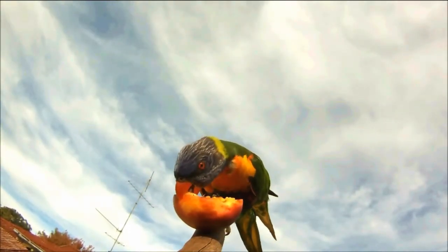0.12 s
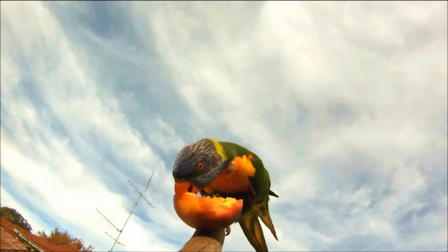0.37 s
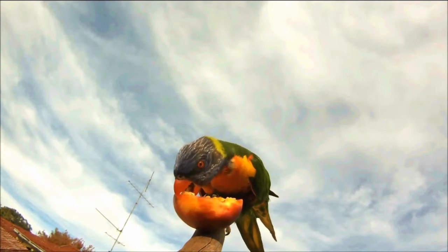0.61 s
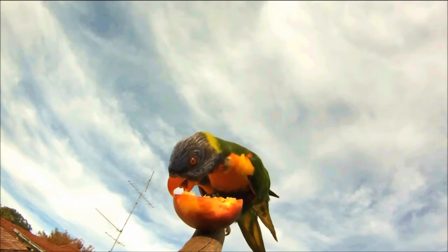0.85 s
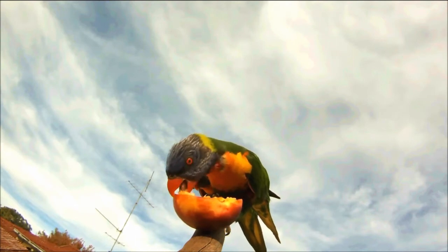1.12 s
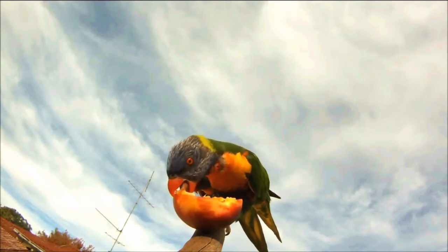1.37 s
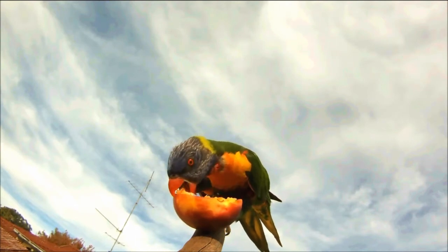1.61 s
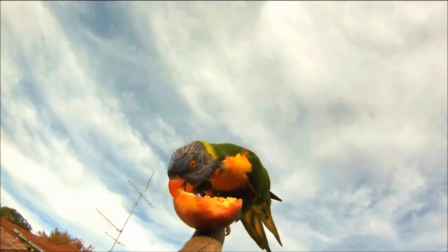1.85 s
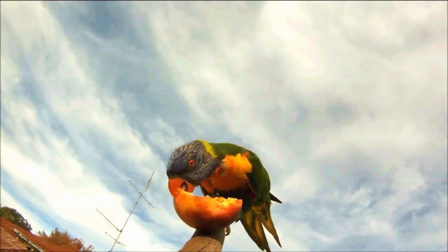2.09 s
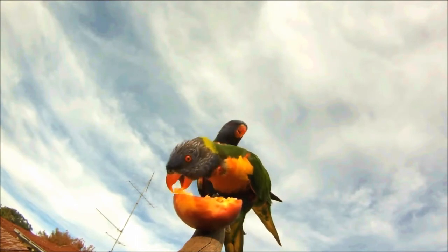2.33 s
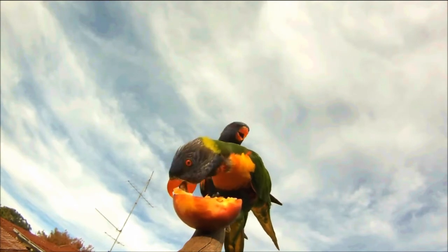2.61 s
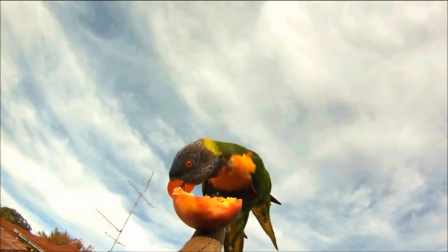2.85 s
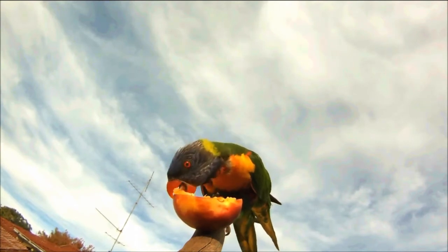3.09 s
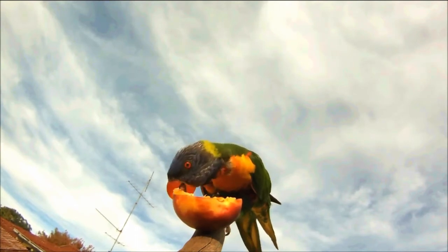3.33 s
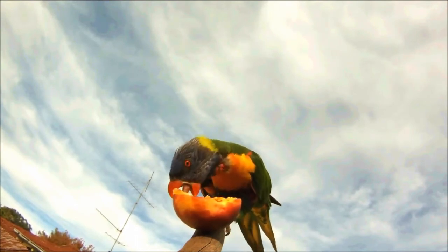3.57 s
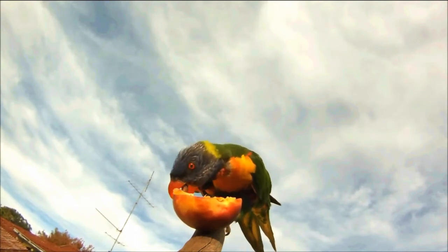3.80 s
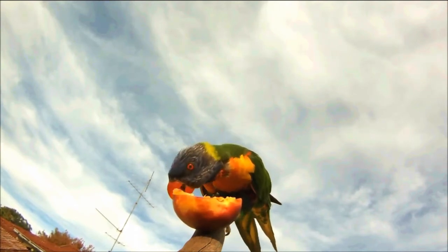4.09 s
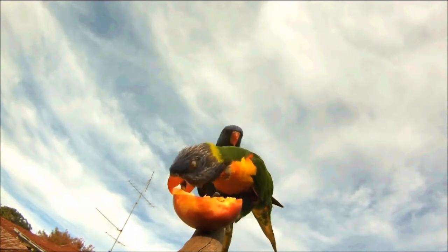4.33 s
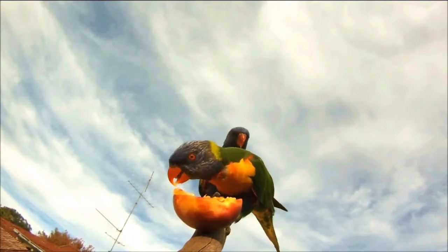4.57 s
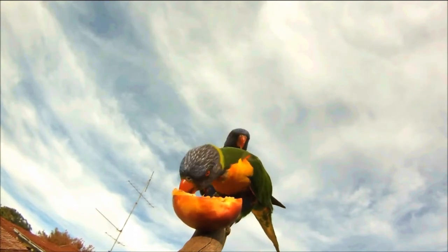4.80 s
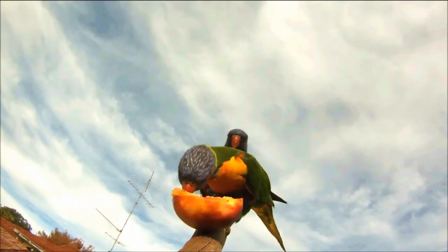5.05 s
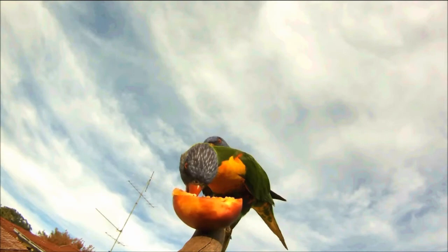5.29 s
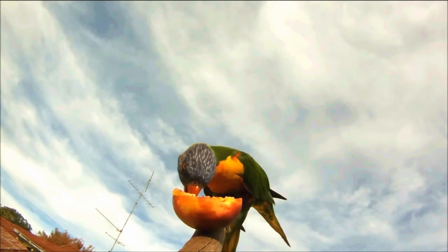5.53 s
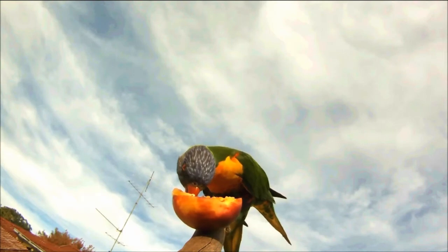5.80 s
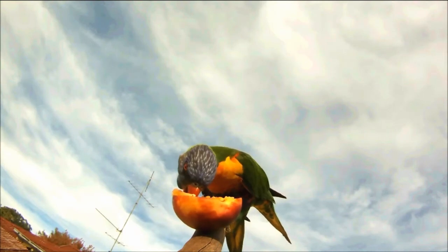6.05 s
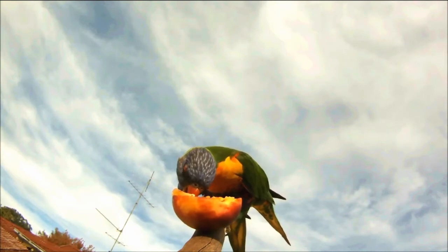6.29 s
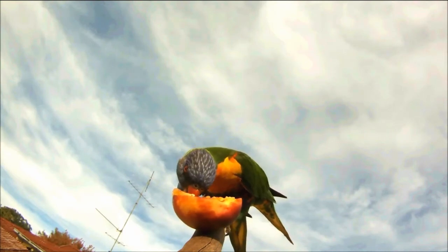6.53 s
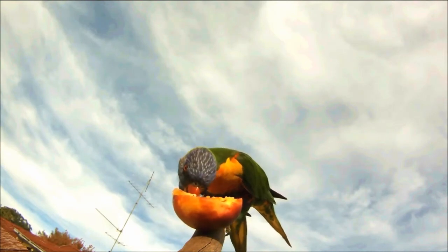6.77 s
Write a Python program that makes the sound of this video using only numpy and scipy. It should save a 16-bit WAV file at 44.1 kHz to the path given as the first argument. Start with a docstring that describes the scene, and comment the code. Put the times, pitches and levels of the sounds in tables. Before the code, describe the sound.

A lorikeet nibbles soft fruit on a wooden perch with small knocks and wet snaps, chirps softly, then lets out one loud squawk.

```python
"""Outdoors, close to a wooden perch: a lorikeet feeds on half a fruit spiked there, over a far hum.
Beak and claws knock and scrabble, which sets decaying wood tones ringing; bites are bursts of tiny snaps.
The voice is a stack of harmonics on a gliding pitch: short chirps and one loud squabbling call.
Filtered noise makes the air, and noise through narrow resonances makes the hum.
The recorder's gain ducks at the loud call and slowly creeps back."""
import sys
import numpy as np
from scipy import signal
from scipy.io import wavfile
from scipy.ndimage import uniform_filter1d

SR = 44100
rng = np.random.default_rng(int(sys.argv[2]) if len(sys.argv) > 2 else 0)


def invert_db(x):
    """Field ratio 10**(x/20) for x, a level in decibels (scalar or array-like)."""
    u = np.asarray(x, float) / 20
    return 10 ** u


def master_out(mix):
    """Clip the mix to full scale and print it as 16-bit PCM to the path in sys.argv[1]."""
    frames = np.transpose(np.atleast_2d(mix))
    ceiling = np.clip(frames, -1, 1)
    pcm = np.round(ceiling * 32767).astype(np.int16)
    wavfile.write(sys.argv[1], SR, pcm)


N = 304290


def rms_one(x):
    """Scales a signal to an average (rms) size of 1."""
    return x / np.sqrt(np.mean(x ** 2) + 1e-20)


def at_hz(points, hz):
    """Reads a curve of (Hz, dB) points at any pitch, evenly along the musical scale."""
    points = np.array(points)
    return np.interp(np.log(hz), np.log(points[:, 0]), points[:, 1])


def drift(rate, size=N):
    """A random wander of average size 1; a higher rate in Hz wanders faster."""
    warm_up = 20000
    r = np.exp(-2 * np.pi * rate / SR)
    slow = signal.lfilter([1], [1, -2 * r, r * r], rng.standard_normal(size + warm_up))[warm_up:]
    return rms_one(slow)


def ring(clicks, hz, t60):
    """A resonance: each unit click sets off a sine of height 1 that fades by 60 dB in t60 seconds."""
    r = invert_db(-60 / (t60 * SR))
    w = 2 * np.pi * hz / SR
    return signal.lfilter([0, np.sin(w)], [1, -2 * r * np.cos(w), r * r], clicks + 1e-18)


# Tone of the outdoor air. Each row: pitch in Hz, relative strength per Hz in dB.
AIR_TONE = [(15, -46), (25, -54), (48, -2), (90, -11.5), (128, 0.5), (163, -22.5), (186, 4.5), (219, -11),
            (264, -6), (318, -10.5), (383, -8.5), (637, -14), (1150, -23), (13100, -36), (15000, -44.5)]
# Stereo width of the air. Each row: pitch in Hz, left-right difference over the middle in dB.
AIR_WIDTH = [(60, -28.5), (180, -35), (550, -19), (1650, -8.5), (4970, -5), (15000, -2)]
# Far machinery. Each row: pitch in Hz, width of the resonance in Hz, level in dB.
MACHINE_HUMS = [(53, 10, -69), (130, 7.2, -53.5), (190.3, 5, -59.5)]
AIR_DB = -50


def air():
    """Far outdoor noise in half-octave stereo bands that flicker a little, plus wavering hums."""
    out = 0
    edges = 22 * 2 ** np.arange(0, 9.6, .5)
    white = rng.standard_normal((2, 2, N))
    for k, (low, high) in enumerate(zip(edges, edges[1:])):
        band = signal.butter(2, [low, high], "band", fs=SR, output="sos")
        mid, side = signal.sosfilt(band, white[k % 2])
        hz = np.sqrt(low * high)
        gain = invert_db(at_hz(AIR_TONE, hz) + .8 * drift(3.0))
        out = out + gain * (mid + invert_db(at_hz(AIR_WIDTH, hz)) * side * [[1], [-1]])
    out = invert_db(AIR_DB) * rms_one(out)
    for hz, width_hz, level_db in MACHINE_HUMS:
        hum = ring(rng.standard_normal(N), hz, 2.8 / width_hz)
        out = out + invert_db(level_db) * rms_one(hum)
    return out


# Knocks on the perch. Each row: start in seconds, strength in dB, then in dB relative to that strength:
# the low tones, the upper pair and the beak's tick.
PERCH_KNOCKS = [(.256, -33.5, -11.5, -11, -20), (.399, -38, -1.5, -20, -27), (.419, -29, -8, -20, -21.5),
                (.768, -24, -22, -2.5, -22.5), (1.422, -40, -23, -14, -25), (1.848, -37.5, -21, -23, -23),
                (2.068, -34.5, -27, -3, -15), (2.159, -33, -12, 3.5, -18), (2.168, -31.5, -26, -7, -26),
                (2.208, -36, -28, -3, -9.5), (2.249, -30.5, -22, -2, -16), (2.26, -31.5, -14, -5, -25),
                (2.826, -32, -9, -14, -27), (2.971, -29.5, -8, -6.5, -15.5), (3.428, -43, -24, 3.5, -15),
                (4.02, -23, -10, -7, -18.5), (4.117, -35.5, -11, -3, -24.5), (4.146, -32, -14, -27, -20.5),
                (4.186, -25, -7, -14, -11.5), (4.216, -26.5, -12, -28, -6), (4.234, -23, -8.5, -8, -21.5),
                (4.253, -15.5, -4.5, -31, -23), (4.297, -20, -21, -3, -14), (4.323, -13, -23, -42, -36),
                (4.344, -16, -19, -12, -23), (4.406, -25, -15, -23, -15), (4.426, -24, -32, -27, -13.5),
                (4.629, -29, -23, -14, -19), (4.646, -26, -31, -11, -20.5), (4.679, -18, -21, -32, -20.5),
                (4.899, -46.5, -7.5, -9, -7.5), (5.21, -33.5, -14.5, -5.5, -24),
                (5.219, -25.5, -6.5, -10.5, -21.5), (5.242, -31.5, .5, -22, -7),
                (5.41, -38, -12.5, -15, -20.5), (6.132, -30, -6.5, -9, -15.5),
                (6.593, -29.5, -10, -13.5, -14), (6.622, -33.5, -2, -14, -12), (6.705, -37.5, -4, -20, -22),
                (6.754, -33.5, -6, -16, -13.5), (6.801, -33, -21.5, -15, -37.5)]
# Tones of the wood in four groups: middle, low, upper pair and the bright ones under a bite.
# Each row: pitch in Hz, relative level in dB, time to fade by 60 dB in seconds.
PERCH_TONES = [
    [(529, -3.5, 0.062), (1041.7, -15.5, 0.075), (1300, -15.5, 0.023)],
    [(350, -1, 0.072), (256.4, -11, 0.055)],
    [(641, 1, 0.054), (677.5, -13.5, .04)],
    [(1600, 1.5, .012), (2210, 1, 0.014), (2920, 2.5, 0.0086), (3500, 1.5, 0.0093), (4000, -15, 0.007),
     (6000, -20.5, 0.0044), (8500, -6.5, 0.008)],
]
KNOCK_SAMPLES = 4000   # how long a knock lasts


def perch():
    """A knock swells over a few milliseconds into the wood's tones; scrabbling rings them too."""
    start_s, strength_db, low_db, upper_db, tick_db = np.transpose(PERCH_KNOCKS)
    middle, low, upper, bright = PERCH_TONES
    groups = [(middle, 0 * start_s, 0), (low, low_db, -5), (upper, upper_db, -3)]
    tones = [(tone, db, rub_db) for table, db, rub_db in groups for tone in table]
    chance = rng.random((len(start_s), 3, len(tones))) - .5
    scrabble = scrabbling()
    t = np.arange(KNOCK_SAMPLES) / SR
    at = (start_s[:, None] * SR).astype(int) + np.arange(KNOCK_SAMPLES)

    out = np.zeros(N + KNOCK_SAMPLES)
    for k, ((hz, level_db, t60), blow_db, rub_db) in enumerate(tones):
        luck, detune, phase = chance[:, :, k, None].transpose(1, 0, 2)
        swell = (1 - np.exp(-t / 0.0013)) ** 2 * invert_db(-60 * t / t60)
        size = invert_db((strength_db + blow_db)[:, None] + level_db + 4.5 + 5.9 * luck)
        detuned_hz = hz * (1 + 0.081 * detune)   # each tone's pitch varies a little at random from knock to knock
        np.add.at(out, at, size * swell * np.sin(2 * np.pi * (detuned_hz * t + phase)))
        out[:N] += invert_db(level_db + rub_db) * ring(scrabble, hz, t60)

    # the wet bite is a burst of tiny snaps
    crackle = rng.standard_normal((len(start_s), KNOCK_SAMPLES)) * invert_db(-60 * t / 0.033)
    snaps = np.zeros(N + KNOCK_SAMPLES)
    np.add.at(snaps, at, invert_db(strength_db + tick_db - 17.5)[:, None] * crackle)
    contacts = snaps[:N] + invert_db(-20.5) * scrabble
    bites = sum(invert_db(db) * ring(contacts, hz, t60) for hz, db, t60 in bright)
    low_cut = signal.butter(2, 140, "high", fs=SR, output="sos")
    return signal.sosfilt(low_cut, out[:N] + bites)


# Bouts of claws scrabbling. Each row: middle in seconds, length in seconds, size of a small contact in dB.
CLAW_BOUTS = [(.4, .14, -56), (1.075, .04, -56), (2.2, .3, -57), (4.035, .06, -48), (4.18, .09, -42),
              (4.315, .11, -33), (4.43, .06, -42), (4.67, .19, -49), (5.24, .06, -43), (5.4, .3, -60),
              (6.59, .07, -53)]
BOUT_EDGE_DB = -14   # a bout swells from this far down and sinks back to it


def scrabbling():
    """Dense uneven little contacts while the bird shifts its grip."""
    t = np.arange(N) / SR
    level = sum(invert_db(db + BOUT_EDGE_DB * (2 * (t - middle_s) / length_s) ** 2)
                for middle_s, length_s, db in CLAW_BOUTS)
    sizes = invert_db(4.0 * np.minimum(rng.exponential(1, N), 4)) * rng.choice([-1, 1], N)
    touches = rng.random(N) < 300 / SR   # about 300 a second
    return level * sizes * touches


def glide(row, shape):
    """A pitch glide, loudest at its low end, as rows of seconds, Hz and dB."""
    start, length, first_hz, last_hz, level_db = row
    fade_db, scoop_hz, bend = shape[2:]
    u = np.linspace(0, 1, 24)
    height = u if last_hz > first_hz else .75 * (1 - u)
    hz = first_hz + (last_hz - first_hz) * u ** bend - scoop_hz * np.exp(-u / .06)
    return np.transpose([start + length * u, hz, level_db - fade_db * height ** 2])


DULLING = .14   # dB that each harmonic past the second loses for one dB less effort


def note(rows, edges, throat, clear, cracked, bright_db=0):
    """Harmonics on a gliding pitch; hoarseness shakes pitch and strength from cycle to cycle."""
    s, hz, level_db = np.transpose(rows)
    at = np.arange(round(s[0] * SR), round(s[-1] * SR))
    t = at / SR
    hz = np.interp(t, s, hz)
    level_db = np.interp(t, s, level_db)
    hz = uniform_filter1d(hz, size=90, mode="nearest")   # the voice rounds its turns
    fade = np.clip(np.minimum((t - s[0]) / edges[0], (s[-1] - t) / edges[1]), 0, 1) ** 2
    # hoarseness moves to its end value late, as the voice runs out
    hoarse = clear + (cracked - clear) * np.linspace(0, 1, len(at)) ** 5.0
    phase = 2 * np.pi * np.cumsum(hz * (1 + .18 * hoarse * drift(600, len(at)))) / SR

    k = np.arange(1, 7)[:, None]   # harmonic numbers
    strengths = invert_db(at_hz(throat, k * hz)) * (k * hz < .45 * SR)
    # a weaker effort is duller
    strengths[2:] *= invert_db(bright_db + DULLING * (k[2:] - 2) * (level_db - level_db.max()))
    shake = 1 + hoarse * np.array([(1 + 0.613 * j) * drift(2100, len(at)) for j in range(len(k))])
    # upper harmonics come and go
    shake[2:] *= invert_db(2.6 * np.array([drift(30, len(at)) for _ in k[2:]]))
    voice = np.sum(strengths * shake * np.cos(k * phase), axis=0)
    even = np.sqrt(2 / np.sum(strengths ** 2, axis=0))   # the throat colours without changing the level
    out = np.zeros(N)
    out[at] = -fade * invert_db(level_db) * voice * even
    return out


# Soft rising chirps. Each row: start in seconds, length in seconds, first and last pitch in Hz, level in dB.
CHIRP_NOTES = [(.923, .042, 1970, 2280, -33), (1.189, .045, 1830, 2320, -32.5)]
# Shape of a chirp: attack in seconds, release in seconds, fade over the note in dB,
# scoop up into the pitch in Hz, bend (no unit; over 1 the glide speeds up).
CHIRP_FORM = (.005, .006, 10, 180, .9)
# Colour that throat and beak give soft notes. Each row: pitch in Hz, strength in dB.
SOFT_COLOUR = [(1800, 0), (2300, -1), (3700, -16), (4300, -11), (6200, -12), (8300, -9), (10400, -14),
               (12500, -26)]
# Hoarseness of each kind of note, here and below. Each entry: amount at the start, amount at the end (0 to 1).
HOARSENESS = dict(chirp=(.045, .02), yelp=(.06, .7), squeal=(.02, .08), squawk=(.015, .55),
              warble=(.1, .07))


def chirps():
    """Soft chirps that scoop up into a rising pitch."""
    return sum(note(glide(row, CHIRP_FORM), CHIRP_FORM, SOFT_COLOUR, *HOARSENESS["chirp"])
               for row in CHIRP_NOTES)


# A brief wavering chirrup. Each row: time in seconds, pitch in Hz, level in dB.
CHIRRUP_PATH = [(2.932, 1820, -50), (2.938, 1880, -35.5), (2.95, 2127, -33.5), (2.958, 2063, -40.5),
                (2.972, 2180, -49), (2.979, 2280, -58)]
# Edges of the notes drawn as a path: attack in seconds, release in seconds.
PATH_EDGES = (.0012, .003)


def chirrup():
    """One soft wavering note, its harmonics past the second lifted by 4 dB."""
    return note(CHIRRUP_PATH, PATH_EDGES, SOFT_COLOUR, *HOARSENESS["chirp"], bright_db=4)


# The squeal that opens the squabble. Each row: time in seconds, pitch in Hz, level in dB.
SQUEAL_PATH = [(4.06, 3720, -50), (4.068, 3390, -44.5), (4.085, 3540, -32), (4.097, 3130, -27),
               (4.102, 3080, -28), (4.104, 2600, -22), (4.115, 2660, -21), (4.135, 2870, -23),
               (4.16, 2900, -16.5), (4.18, 3015, -16), (4.192, 2940, -22), (4.201, 2690, -42)]
# Colour that throat and beak give it. Each row: pitch in Hz, strength in dB.
SQUEAL_COLOUR = [(2700, 0), (3600, 0), (5300, -7), (5900, 3), (6300, -8), (7200, -3), (8700, -4.5),
                 (11600, -9), (14500, -27)]


def squeal():
    """A high note that drops, rises again and swells, with strong upper harmonics."""
    return note(SQUEAL_PATH, PATH_EDGES, SQUEAL_COLOUR, *HOARSENESS["squeal"])


# Short yelps, low rising and high falling in turn.
# Each row: start in seconds, length in seconds, first and last pitch in Hz, level in dB.
YELP_NOTES = [(4.3045, .013, 2240, 2900, -15), (4.315, .01, 4000, 3480, -22),
              (4.3235, .017, 2360, 3050, -8.5), (4.337, .01, 4180, 3600, -18)]
# Shape of a yelp: attack in seconds, release in seconds, fade in dB, scoop in Hz, bend (no unit).
YELP_FORM = (.0015, .002, 19, 0, 1.4)
# Colour that throat and beak give yelps and squawk. Each row: pitch in Hz, strength in dB.
SQUAWK_COLOUR = [(2350, -12), (2450, -15), (2800, -6), (3900, -5), (4900, 2), (5600, -4), (6000, -9),
                 (7300, -17), (8000, -12), (9700, -12), (10800, -14), (12200, -33)]


def yelps():
    """Four quick gliding yelps that open the squawk, each cracking at its end."""
    return sum(note(glide(row, YELP_FORM), YELP_FORM, SQUAWK_COLOUR, *HOARSENESS["yelp"])
               for row in YELP_NOTES)


# The held squawk. Each row: time in seconds, pitch in Hz, level in dB.
SQUAWK_PATH = [(4.346, 2350, -10), (4.352, 2354, -8.5), (4.36, 2458, -9.5), (4.375, 2420, -9.5),
               (4.384, 2496, -13), (4.387, 2753, -18.5), (4.395, 2756, -21.5), (4.403, 2620, -33)]


def squawk():
    """A loud held note that turns hoarse as it runs out."""
    return note(SQUAWK_PATH, PATH_EDGES, SQUAWK_COLOUR, *HOARSENESS["squawk"])


# The last soft warble. Each row: time in seconds, pitch in Hz, level in dB.
WARBLE_PATH = [(6.189, 1300, -52), (6.198, 2040, -35.5), (6.207, 1860, -34), (6.213, 1563, -35),
               (6.228, 1955, -36), (6.235, 1645, -36), (6.247, 1850, -33), (6.256, 1755, -34.5),
               (6.258, 1940, -35), (6.27, 1950, -36.5), (6.279, 1900, -52)]
# Colour that throat and beak give it. Each row: pitch in Hz, strength in dB.
WARBLE_COLOUR = [(1600, -1), (2000, 0), (3200, -8), (3900, -16), (5200, -6), (7300, -11), (9000, -16),
                 (11500, -16)]


def warble():
    """A soft note whose pitch swings up and down."""
    return note(WARBLE_PATH, PATH_EDGES, WARBLE_COLOUR, *HOARSENESS["warble"])


def lorikeet():
    """All the calls of the bird, with the highest treble rolled off."""
    calls = chirps() + chirrup() + squeal() + yelps() + squawk() + warble()
    return signal.sosfilt(signal.butter(6, 12300, fs=SR, output="sos"), calls)


ECHO_LAG_S, ECHO_T60_S, ECHO_DB = .02, .35, -39   # off roofs and walls


def echoes(x):
    """A faint scattered tail of fading noise, different in each ear."""
    t = np.arange(SR // 2) / SR - ECHO_LAG_S
    fade = np.clip(t / .02, 0, 1) * invert_db(-60 * t / ECHO_T60_S)
    tail = fade * rng.standard_normal((2, SR // 2))
    tail = tail / np.sqrt(np.sum(tail ** 2) / 2)
    return invert_db(ECHO_DB) * signal.fftconvolve(x[None], tail, axes=1)[:, :N]


def spread(x, lean_db, treble_db):
    """A close source reaches both ears almost alike; it leans right, the treble a little differently."""
    side = invert_db(lean_db) * x + invert_db(treble_db) * np.diff(x, prepend=0)
    return np.array([x - side, x + side])


def scene():
    """Air, perch and bird together, with echoes of the bird's voice."""
    bird = lorikeet()
    return air() + spread(perch(), -45, -11) + spread(bird, -25, -23.5) + echoes(bird)


def top_cut(x):
    """Nothing passes above the cut-off."""
    return signal.sosfilt(signal.butter(12, 15580, fs=SR, output="sos"), x)


DUCK_ABOVE_DB, DUCK_SHARE, RECOVERY_DB_S = -24.5, .35, .2   # share: dB of ducking per dB above
TOP_HZ = 14560   # treble limit


def record(dry):
    """Gain control: a loud sound pulls the gain down within a moment, then it creeps back."""
    level_db = 10 * np.log10(uniform_filter1d(np.mean(dry, axis=0) ** 2, size=1000) + 1e-12)
    ramp = RECOVERY_DB_S * np.arange(N) / SR
    wanted_db = DUCK_SHARE * np.maximum(level_db - DUCK_ABOVE_DB, 0)
    # hold the deepest duck so far, less what has been recovered since
    duck_db = np.maximum.accumulate(wanted_db + ramp) - ramp
    r = np.exp(-1 / (.03 * SR))   # the gain moves smoothly, over about 30 ms
    ducked = dry * invert_db(-signal.lfilter([1 - r], [1, -r], duck_db))
    treble_limit = signal.ellip(10, .5, 70, TOP_HZ, fs=SR, output="sos")
    return top_cut(signal.sosfilt(treble_limit, ducked))


dry = scene()
out = record(dry)
master_out(out)
```